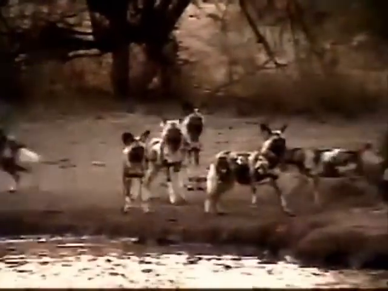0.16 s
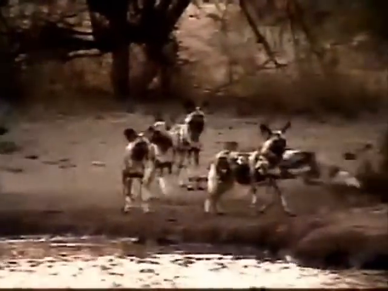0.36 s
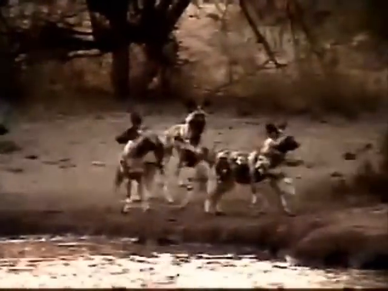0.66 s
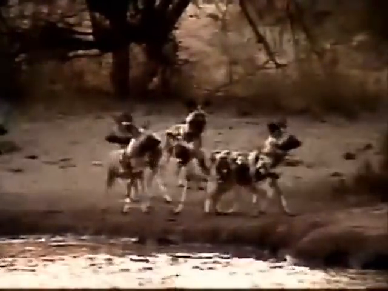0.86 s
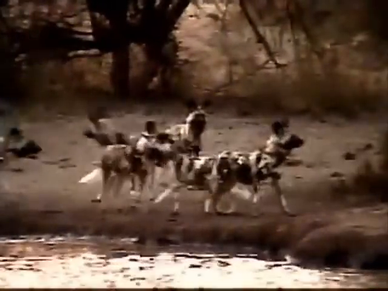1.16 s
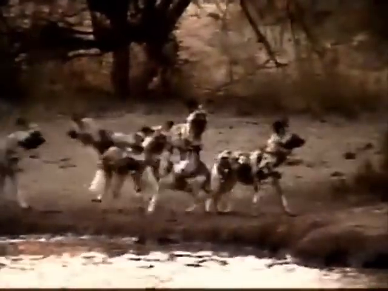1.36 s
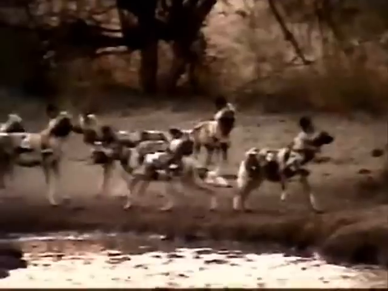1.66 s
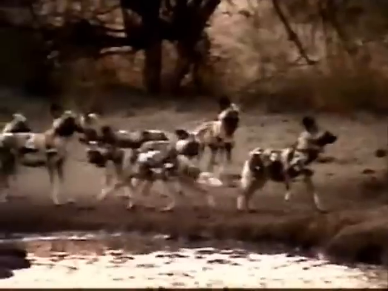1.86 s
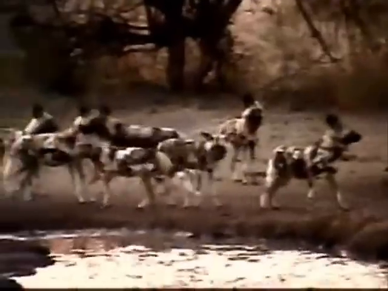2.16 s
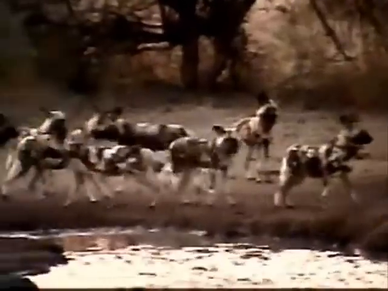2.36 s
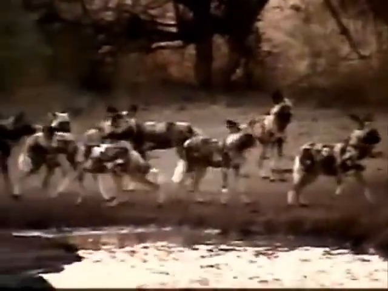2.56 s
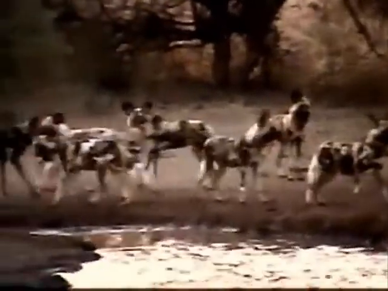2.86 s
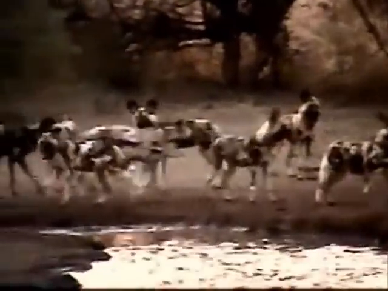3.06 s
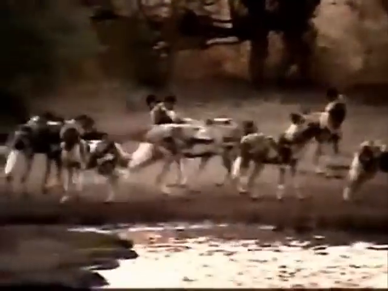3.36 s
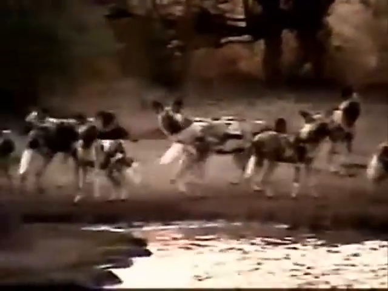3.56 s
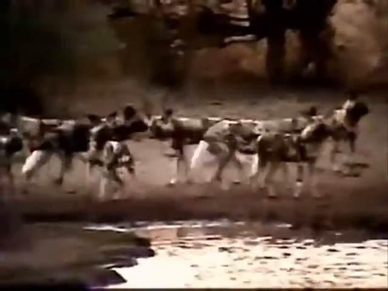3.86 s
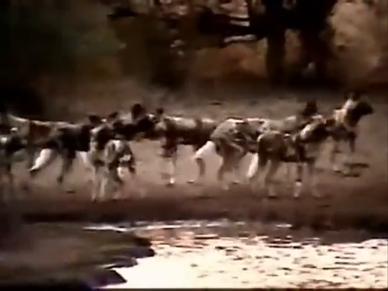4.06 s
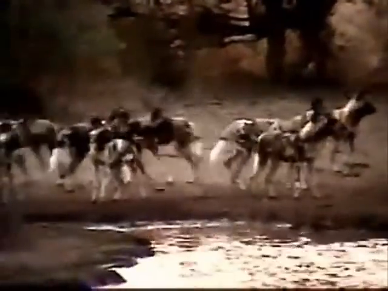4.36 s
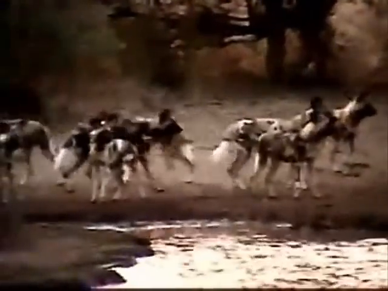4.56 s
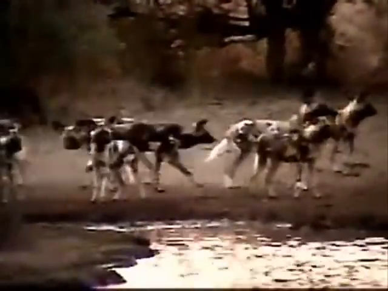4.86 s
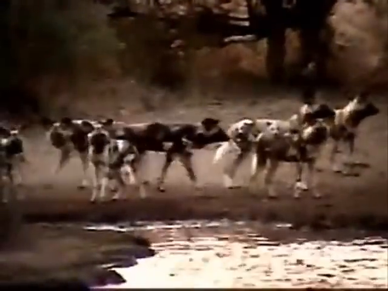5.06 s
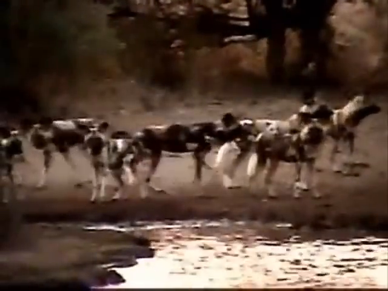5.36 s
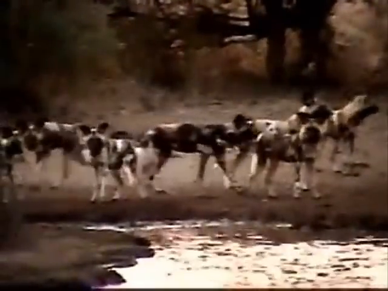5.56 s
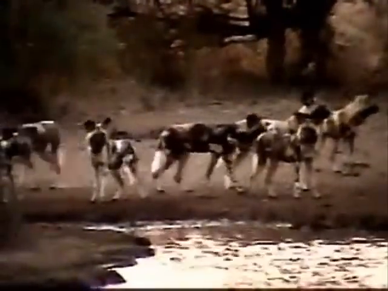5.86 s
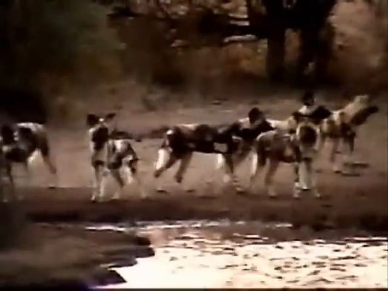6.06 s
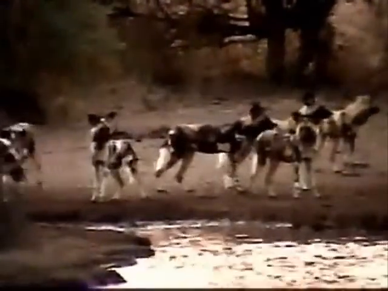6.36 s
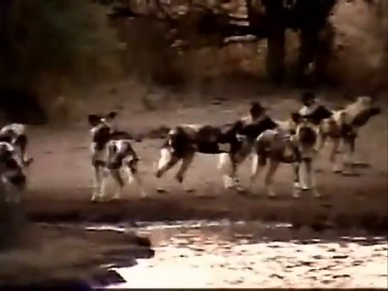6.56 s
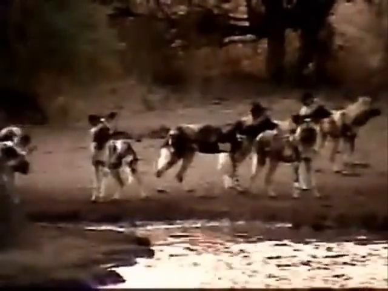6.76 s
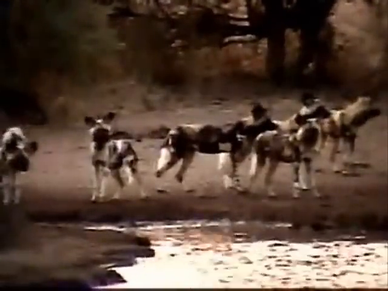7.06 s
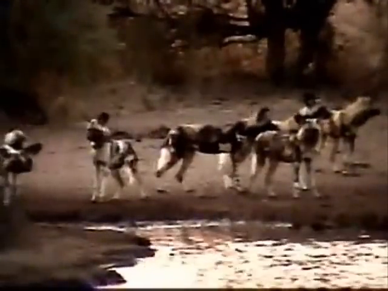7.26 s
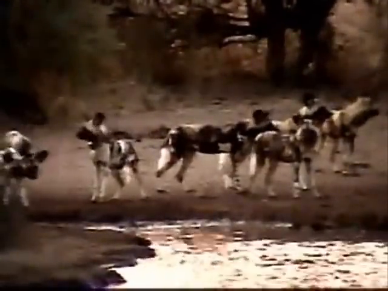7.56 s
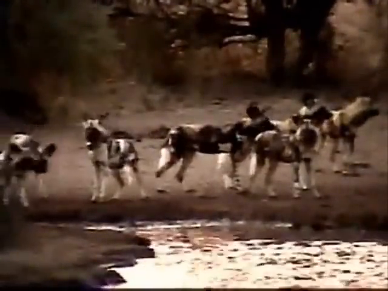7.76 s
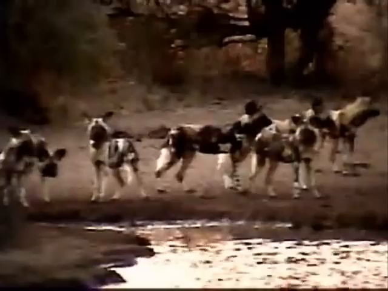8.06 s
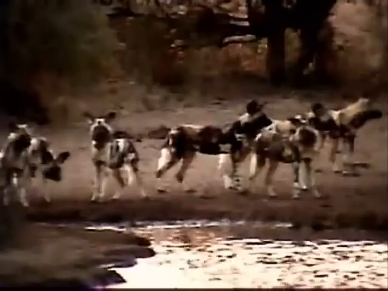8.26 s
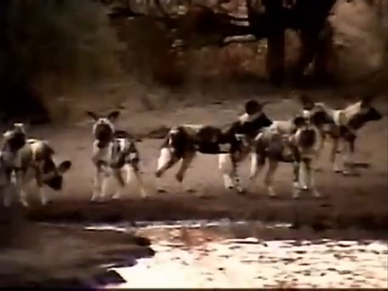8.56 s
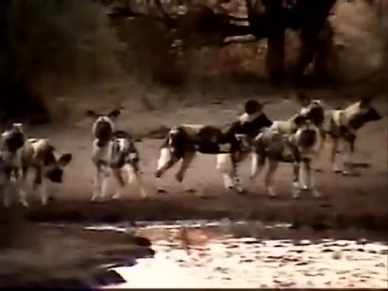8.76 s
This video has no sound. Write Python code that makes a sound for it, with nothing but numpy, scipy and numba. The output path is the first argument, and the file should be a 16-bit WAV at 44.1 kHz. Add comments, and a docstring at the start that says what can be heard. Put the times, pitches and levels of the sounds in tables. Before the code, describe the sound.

A pack of wild dogs chatters in quick, high, hoarse yelps and squeaks by a waterhole, then drops to faint huffs and distant chirps.

```python
"""Wild dogs at a waterhole: from the start, three-throated barks, hoarse yelps and squeaks over a murmur.
Swept sine pairs and breath noise make the voices, bending sines with a little rasp the squeaks.
After six seconds the pack quiets to huffs and far chirps, both puffs of narrow noise, and a faint ping rings.
Bush hiss, click-driven camera buzz, hum and circuit noise run throughout. Calls and background pass a narrow,
lopsided amplifier; treble hiss and a few pops join, then repeated samples mirror the calls in the treble."""
import sys
import numpy as np
from scipy import signal
from scipy.io import wavfile
from scipy.ndimage import uniform_filter1d, map_coordinates
from numba import njit

SR = 44100
rng = np.random.default_rng(int(sys.argv[2]) if len(sys.argv) > 2 else 0)


def log_audio(samples):
    """Write samples as a 16-bit WAV file to the path given in sys.argv[1]."""
    # one column per channel
    frames = np.atleast_2d(samples).T
    # limit to full scale, then quantise
    limited = np.clip(frames, -1, 1)
    pcm = np.round(limited * 32767).astype(np.int16)
    wavfile.write(sys.argv[1], SR, pcm)


N = 393019
T = np.arange(N) / SR

# throats of the pack, low, middle, high: pitch_hz, sag_s, release_s, murmur_db; times are for a 64 dB fall
THROATS = [(1769, 4.6, 0.12, -21.5), (2672, 0.85, 0.61, -5.5), (3223, 3.5, 0.66, -8.5)]
# chatter barks, all throats at once: start_s, hold_s, low_db, middle_db, high_db, middle_pitch_hz
BARKS = [(0.0, 0.064, -20, -12, -47, 2690), (0.176, 0.11, -32, -15, -29.5, 2628),
         (1.332, 0.058, -14.5, -16, -28.5, 2502), (1.482, 0.096, -18, -15, -23.5, 2708),
         (1.726, 0.0793, -29, -12, -29.5, 2745), (2.758, 0.037, -27, -20, -16, 2600),
         (2.853, 0.038, -21, -11, -27, 2810), (2.924, 0.047, -20.5, -18.5, -25, 2844),
         (3.931, 0.092, -28, -14, -27, 2880), (4.083, 0.096, -22.5, -15, -30, 2875),
         (4.237, 0.045, -21.5, -13.5, -22, 2760), (5.373, 0.077, -27.5, -12, -23, 2852),
         (5.562, 0.096, -22, -14.5, -23, 2669), (5.756, 0.051, -26, -11, -28, 2722)]
# single hoarse yelps: start_s, attack_s, hold_s (from the start to the cut), level_db, pitch_hz, glide_hz_per_s
YELPS = [(0.389, 0.013, 0.11, -29, 2932, -300), (0.883, 0.031, 0.12, -14, 1690, -100),
         (1.891, 0.032, 0.2, -24.5, 3386, 195), (1.943, 0.03, .11, -21.5, 2712, -300),
         (1.981, 0.022, 0.046, -35, 1760, 200), (2.145, 0.014, 0.11, -29, 3413, 195),
         (2.341, 0.016, 0.1345, -11.5, 1690, -100), (2.409, 0.03, 0.041, -17, 2480, 1017),
         (2.59, 0.01, 0.2, -23.5, 2670, -200), (2.621, .016, 0.081, -29, 3390, 306),
         (3.082, 0.0097, 0.19, -29, 2736, 200), (3.249, 0.03, 0.14, -21.5, 2648, -200),
         (3.242, 0.0091, 0.13, -28.5, 3324, 199), (3.478, 0.022, 0.19, -31.5, 3400, 192),
         (3.548, 0.026, .12, -12, 1700, 1815), (3.601, 0.03, 0.076, -24.5, 2490, 1510),
         (3.764, 0.036, 0.043, -31.5, 1880, 193.5), (4.373, 0.017, 0.024, -30, 2880, 200),
         (4.812, 0.0044, 0.24, -30.5, 2547, 286), (4.978, 0.021, 0.13, -31, 3550, -800),
         (4.988, 0.039, 0.11, -12, 1660, 609), (5.218, 0.015, 0.081, -33, 3400, 200),
         (5.963, 0.018, 0.12, -28, 2867, -800)]
# centre level of the pack's murmur between calls: time_s, level_db
MURMUR_LEVELS = [(0.0, -11.5), (0.15, -29), (0.67, -39.5), (0.96, -54), (1.9, -24.5), (2.24, -39),
                 (2.42, -55), (2.62, -27), (2.86, -21), (3.88, -54.5), (4.11, -17), (4.59, -43.5),
                 (4.85, -104), (4.97, -35.5), (5.33, -35), (5.54, -30), (5.85, -32), (6.2, -48)]
# squeaks, with the bright streaks and low undertones inside some barks and yelps:
# start_s, length_s, start_hz, middle_hz, end_hz, level_db
SQUEAKS = [(0.164, 0.027, 2270, 2136, 1960, -21), (.19, 0.067, 3190, 3198, 3235, -13.5),
           (0.1, 0.059, 3270, 3240, 3160, -31), (0.202, 0.048, 1582, 1622, 1660, -22.5),
           (0.905, 0.04, 1684, 1664, 1674, -14), (0.908, .026, 3270, 3360, 3360, -33.5),
           (1.476, 0.019, 3320, 3210, 3140, -24.5), (1.538, 0.043, 1680, 1682, 1640, -20.5),
           (3.93, 0.062, 2978, 3047, 3037, -14.5), (4.076, 0.042, 1695, 1890, 2017, -20),
           (4.088, 0.034, 2913, 2950, 2980, -18), (4.085, 0.037, 2584, 2550, 2640, -15.5),
           (5.559, 0.027, 1680, 1626, 1600, -25), (0.383, 0.051, 3216, 3188, 3264, -27),
           (0.478, 0.045, 3266, 3196, 3180, -25), (1.12, 0.063, 2906, 2885, 2830, -31),
           (1.219, 0.043, 2650, 2680, 2700, -22.5), (1.265, 0.086, 1887, 2087, 1924, -14.5),
           (1.686, 0.048, 2260, 2223, 1950, -22.5), (1.764, 0.15, 2700, 2673, 2720, -21),
           (1.928, 0.038, 3380, 3423, 3390, -20), (2.131, 0.064, 3407, 3360, 3527, -25.5),
           (2.428, 0.091, 2492, 2552, 2756, -11.5), (2.429, 0.028, 1290, 1236, 1290, -34),
           (2.621, 0.1, 3410, 3340, 3360, -27.5), (2.716, 0.034, 2437, 2366, 2537, -12.5),
           (3.049, 0.032, 2825, 2612, 2510, -18.5), (3.069, 0.064, 1577, 1707, 1875, -27.5),
           (3.211, 0.025, 2760, 2630, 2450, -18.5), (3.546, 0.12, 1646, 1805, 1983, -12.5),
           (3.574, 0.12, 1223, 1263, 1370, -35.5), (3.853, 0.05, 1960, 2170, 2370, -25.5),
           (3.886, 0.05, 2325, 2415, 2350, -14.5), (2.755, 0.031, 3335, 3143, 3020, -15),
           (5.007, 0.028, 1697, 1665, 1740, -12.5), (5.073, .05, 1823, 1907, 2070, -20),
           (4.807, 0.073, 2702, 2457, 2586, -24.5), (5.063, 0.082, 2440, 2440, 2660, -25.5),
           (4.889, 0.12, 2560, 2570, 2574, -32.5), (5.061, 0.049, 1230, 1212, 1180, -38),
           (5.316, 0.061, 2200, 2253, 2200, -16.5), (5.733, 0.028, 2226, 2110, 1940, -24.5)]
# short huffs of the quiet pack: time_s, gain_db
HUFFS = [(6.2098, -49), (6.2911, -48), (6.383, -44.5), (6.5765, -45), (6.7586, -49), (6.8494, -44),
         (7.2759, -45.5), (8.0012, -48), (8.1035, -47), (8.2212, -49)]
# far chirps once the pack falls quiet: time_s, gain_db, centre_hz
CHIRPS = [(6.3041, -50, 3180), (6.5076, -42, 3320), (6.6069, -49, 3560), (6.953, -50.5, 3570),
          (7.3332, -49, 3280), (7.414, -51, 3420), (7.4634, -43, 3480), (7.6864, -46, 3540),
          (7.9274, -45, 3400), (8.2641, -49, 3270), (8.438, -45, 3500), (8.7655, -41, 3360),
          (8.8952, -47, 3480)]
# microphone resonances, heard on bush and buzz: centre_hz, width_hz, gain_db
MIC_RESONANCES = [(1302, 180, -10.5), (1624, 167, -2), (2004, 150, -5), (2542, 320, 1.5), (2886, 190, -6),
                  (3434, 165, -4)]
# strong partials of the camera's buzz: near_hz (moved to the closest harmonic), level_db
BUZZ_PARTIALS = [(1696, -54.5), (1900, -58.5), (2196, -73), (2498, -60), (2600, -46.5), (2697, -54.5),
                 (3300, -61)]
# faint pings that ring on: start_s, pitch_hz, strike_db, ring_db
PINGS = [(7.545, 484, -54, -70), (7.81, 500, -59, -85)]
# narrow dips in the microphone's response: centre_hz, width_hz
MIC_DIPS = [(1440, 52), (3120, 97)]
# brief pops, added after the amplifier: time_s, size_db
POPS = [(1.358, -9), (2.808, -11), (2.9, -15)]

CALL_FLOOR_HZ = 1223
BARK_ATTACK_S, BARK_GLIDE_HZ_S = .013, -600
YELP_SAG_S, YELP_RELEASE_S = 0.85, 0.073  # times for a 64 dB fall
TAIL_DB, TAIL_S = -14.5, 11  # a yelp's whimper lies this far down; 64 dB fall time before its linear fade
STRAND_HZ, STRAND_DB = 230.3, -5.5  # second strand: this much higher in pitch, about this far down
RATTLE_HZ, RATTLE_DEPTH = 140, .5  # the hoarse throat flaps at about this rate and depth
CUT_DB, CUT_S = -8, .008  # size and time constant of the quick drop when a call stops
SWELL_DB_S, RASP_DB = 101, -15.5  # how fast a squeak grows; rough air around it
HUFF_HZ = 1655
BUZZ_HZ, HUM_HZ = 99.9, 120
BAND_HZ, TOP_HZ = 3700, 15420  # upper limits ahead of the amplifier and after the sample repetition
OLD_RATE, BLOCK_IN, BLOCK_OUT = 32000, 1152, 1587  # slower rate in Hz; block sizes in samples


def pack():
    """Barks from three throats, single yelps with a whimpering tail, and a fluttering murmur under them."""
    t = T[:SR // 2]
    luck = chance()
    calls = []
    for start, attack, hold, db, pitch, glide in YELPS:
        hz = pitch + glide * np.minimum(t, hold)
        yelp = envelope(t, attack, hold, YELP_SAG_S, YELP_RELEASE_S)
        whimper = undb(TAIL_DB) * envelope(t, attack, hold, TAIL_S, TAIL_S) * (1 - t / t[-1])
        calls.append((start, hz, undb(db) * (yelp + whimper)))
    for start, hold, low_db, middle_db, high_db, middle_hz in BARKS:
        levels = (low_db, middle_db, high_db)
        pitches = (THROATS[0][0], middle_hz, THROATS[2][0])
        for db, pitch, (_, sag, release, _) in zip(levels, pitches, THROATS):
            hz = pitch + BARK_GLIDE_HZ_S * np.minimum(t, hold)
            calls.append((start, hz, undb(db) * envelope(t, BARK_ATTACK_S, hold, sag, release)))

    out = np.zeros(N + SR)
    # every call reads the same random curves from a different place
    shifts = rng.integers(0, N // 2, len(calls))
    for (start, hz, shape), shift in zip(calls, shifts):
        first = max(int((start - .005) * SR), 0)  # 5 ms ahead of the listed start
        out[first:][:len(t)] += shape * voice(hz, shift, *luck)

    murmur = np.zeros(N)
    for pitch, _, _, db in THROATS:
        flutter = undb(db + 3.87 * walk(17))
        murmur += flutter * voice(pitch * (1 + .03 * walk(9)), 0, *chance())
    times, levels = np.array(MURMUR_LEVELS).T
    out = out[:N] + murmur * undb(np.interp(T, times, levels, right=-90))
    # the calls give little below about 1.2 kHz
    return signal.sosfilt(signal.butter(4, CALL_FLOOR_HZ, "high", fs=SR, output="sos"), out)


def voice(hz, shift, kick, throb, weave, air):
    """Two whistles whose pitch is kicked about and whose level throbs, in a cloud of breath; rms 1."""
    def whistle(f, place):
        """A throbbing sine, its pitch pushed by fast kicks and a bounded slow weave."""
        pitch = f + 70 * kick[place] + 70 * np.tanh(weave[place])
        return level(throb[place] * np.sin(2 * np.pi * np.cumsum(pitch) / SR), 0)

    own = slice(shift, shift + len(hz))
    other = (np.arange(len(hz)) + shift + N // 3) % N
    # the second strand comes and goes on its own stretch of the curves
    strand = undb(STRAND_DB + 1.87 * weave[other[::-1]]) * whistle(hz + STRAND_HZ, other)
    breath = svf(svf(air[own], hz, 0.35 * hz[0]), hz, 0.35 * hz[0])
    return level(whistle(hz, own) + strand + level(throb[own] * breath, -8), 0)


def envelope(t, attack, hold, sag, release):
    """Attack, sagging hold, a quick cut, exponential release."""
    after = np.maximum(t - hold, 0)
    cut = undb(CUT_DB * (1 - np.exp(-after / CUT_S)))
    fall = 0.00062 ** (np.minimum(t, hold) / sag + after / release)  # 64 dB per sag or release time
    return np.clip(t / attack, 0, 1) ** 0.83 * cut * fall


def chance():
    """Pitch kicks, throb with an uneven rattle, slow pitch weave and air for a voice."""
    rattle = np.sin(2 * np.pi * np.cumsum(RATTLE_HZ * (1 + .22 * walk(40))) / SR)
    depth = np.clip(RATTLE_DEPTH * (1 + 0.49 * walk(25)), 0, 1)
    kick = walk(260)
    throb = (1 + depth * rattle) * undb(2.05 * walk(180) + 1.52 * walk(45))
    return kick, throb, walk(35), rng.standard_normal(N)


def squeaks():
    """Near sines that bend through three pitches and swell, unsteady and a little raspy."""
    out = np.zeros(N)
    waver_hz, flutter, air = 40 * walk(220), undb(1.21 * walk(150)), rng.standard_normal(N)
    for start, length, start_hz, middle_hz, end_hz, db in SQUEAKS:
        i = np.arange(int(start * SR), int((start + length) * SR))
        u = (i - i[0]) / len(i)
        # a parabola through the three pitches
        hz = start_hz * (1 - u) * (1 - 2 * u) + 4 * middle_hz * u * (1 - u) + end_hz * u * (2 * u - 1)
        tone = np.sqrt(2) * flutter[i] * np.sin(2 * np.pi * np.cumsum(hz + waver_hz[i]) / SR)
        rasp = level(svf(svf(air[i], hz, 550.0), hz, 550.0), RASP_DB)
        swell = undb(db - SWELL_DB_S * length * np.maximum(.65 - u, 0))  # grows until 65 % through
        out[i] += swell * np.sin(np.pi * u) ** 0.34 * (tone + rasp)
    return out


def echo(x, t60, wet_db):
    """The banks and trees send back a short diffuse tail: decaying noise after a 15 ms gap."""
    t = T[:SR // 2]
    decay = np.exp(-np.log(1000) * t / t60) * (t > .015)
    tail = level(rng.standard_normal(len(t)) * decay, 0) / np.sqrt(len(t))
    return x + undb(wet_db) * signal.fftconvolve(x, tail)[:N]


def puffs(table, length, width):
    """Huffs and chirps as brief swells of narrow noise."""
    out = np.zeros(N)
    for time, db, hz in table:
        u = np.clip((T - time) / length + 0.37, 0, 1)  # the listed time falls 37 % into the puff
        out += undb(db) * np.sin(np.pi * u) ** 2 * level(band(rng.standard_normal(N), hz, width), 3.5)
    return out


def bush():
    """Far hiss and chatter, swelling and fluttering band by band around the microphone's resonances."""
    swell = walk(6.6)  # shared by all bands
    out = np.zeros(N)
    for hz, width, db in MIC_RESONANCES:
        hiss = band(rng.standard_normal(N), hz * (1 + 0.029 * walk(10)), 1.3 * width)
        out += level(hiss, db - 52.5) * undb(0.98 * swell + 2.0 * walk(30) + 2.45 * walk(60))
    return out


def camera():
    """Clicks at a steady rate buzz in the body; a hum, faint ringing pings and circuit noise lie under them."""
    clicks = np.diff(np.floor(BUZZ_HZ * T), prepend=0)
    buzz = level(mic(mic(clicks)), -61.0)
    for near_hz, db in BUZZ_PARTIALS:
        hz = BUZZ_HZ * round(near_hz / BUZZ_HZ)
        buzz += undb(db + 2.66 * walk(25)) * np.sin(2 * np.pi * hz * T + 2 * np.pi * rng.random())
    out = buzz * undb(3.4 * walk(35)) + undb(-73.5) * np.sin(2 * np.pi * HUM_HZ * T)
    for start, hz, strike_db, ring_db in PINGS:
        since = np.maximum(T - start, 0)
        strike = undb(strike_db) * np.exp(-since / 0.02)
        ring = undb(ring_db + 3.4 * walk(8)) * np.exp(-since / 1.8)
        out += (strike + ring) * np.sin(2 * np.pi * hz * since)
    return out + level(svf(rng.standard_normal(N), np.full(N, 300.), 2000.0), -64.0)


def mic(x):
    """The small microphone rings at a few resonances with notches between."""
    return sum(undb(db) * svf(x, np.full(N, 1. * hz), 1. * width) for hz, width, db in MIC_RESONANCES)


def undb(db):
    """Decibels to gain."""
    return 10 ** (np.asarray(db) / 20)


def level(x, db):
    """Set the rms level."""
    return x * undb(db) / np.sqrt(np.mean(x ** 2))


@njit
def svf(x, hz, width):
    """State-variable band-pass with a moving centre, gain 1 there."""
    y, b, l = np.empty(len(x)), 0., 0.  # output, band and low states
    for i in range(len(x)):
        g, k = np.tan(np.pi * hz[i] / SR), width / hz[i]
        v = (b + g * (x[i] - l)) / (1 + g * (g + k))
        b, l, y[i] = 2 * v - b, l + 2 * g * v, k * v
    return y


def band(x, hz, width):
    """A steep resonance: the band-pass twice."""
    hz = hz + np.zeros(N)
    return svf(svf(x, hz, 1. * width), hz, 1. * width)


def walk(rate):
    """Random levels held 1 / rate s and smoothed twice; rms 1."""
    k = max(int(SR / rate), 2)
    steps = np.repeat(rng.standard_normal(N // k + 1), k)
    return level(uniform_filter1d(uniform_filter1d(steps, k), k)[:N], 0)


def scene():
    """Dogs over the quiet of the waterhole."""
    dogs = echo(pack() + squeaks(), t60=0.27, wet_db=-9.5)
    chirps = puffs(CHIRPS, 0.081, 220)
    huffs = puffs([(time, db, HUFF_HZ) for time, db in HUFFS], 0.075, 170)
    return (dogs + chirps + huffs + bush() + camera())[None]


def record(dry):
    """Dips, a narrow band, a lopsided amplifier with level-following grit, hiss and pops, sample repetition."""
    x = dry[0]
    for hz, width in MIC_DIPS:
        x = x - svf(x, np.full(N, 1. * hz), 1. * width)
    x = signal.sosfilt(signal.ellip(6, .5, 50, BAND_HZ, fs=SR, output="sos"), x)
    loudness = np.sqrt(uniform_filter1d(x ** 2, size=400) + 1e-12)
    grit = svf(rng.standard_normal(N), np.full(N, 600.), 2800.0) * loudness
    octave = band(np.abs(x) ** 1.72, 5460, 1850)  # the lopsided curve adds doubled pitches
    x = 0.85 * np.tanh((x + 0.36 * octave) / 0.75) + undb(-34.5) * grit
    x += level(band(rng.standard_normal(N), 5700, 3600), -70.5)  # the amplifier's own treble hiss
    for time, db in POPS:
        x += undb(db) * np.exp(-((T - time) / 0.000052) ** 2)
    # each output sample repeats the latest sample of the slower rate, counted afresh in every block
    block, j = np.divmod(np.arange(N), BLOCK_OUT)
    slow_index = block * BLOCK_IN + j * OLD_RATE // SR
    held = map_coordinates(x, [slow_index * BLOCK_OUT / BLOCK_IN], order=3, mode="nearest")
    return signal.sosfilt(signal.ellip(10, .2, 70, TOP_HZ, fs=SR, output="sos"), held)[None]


dry = scene()
out = record(dry)
log_audio(out)
```